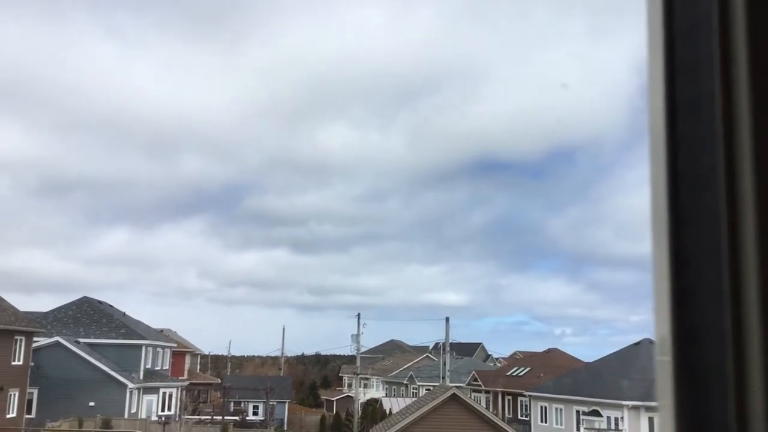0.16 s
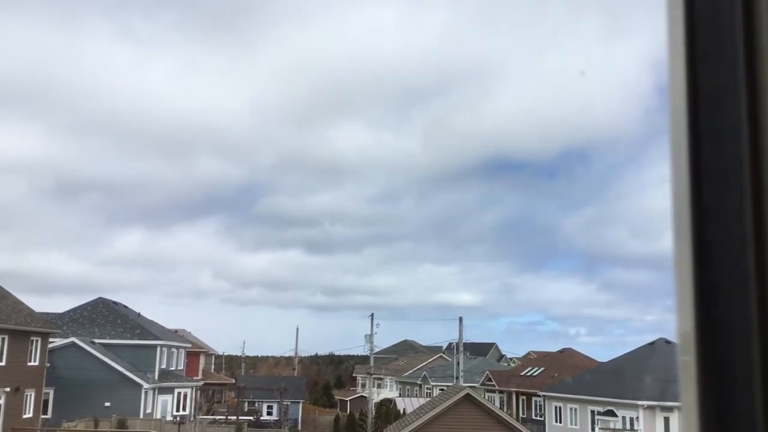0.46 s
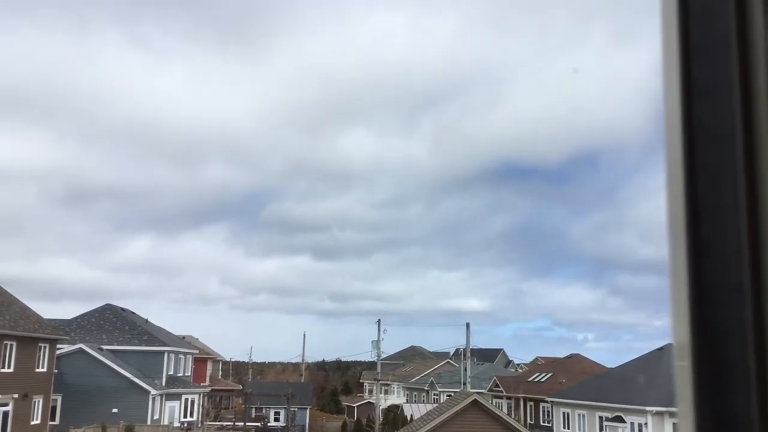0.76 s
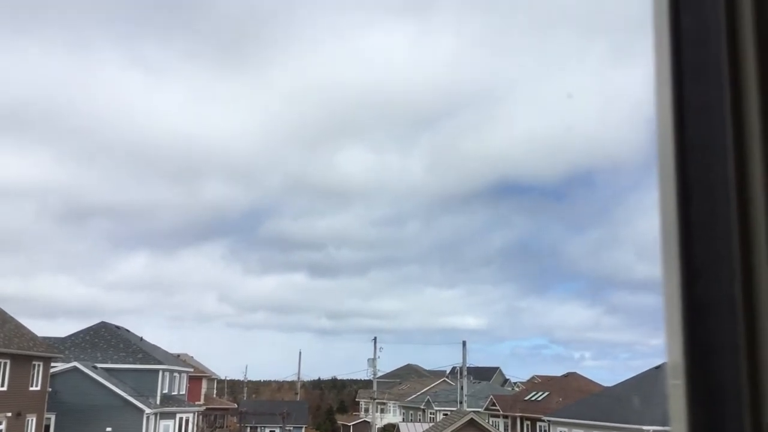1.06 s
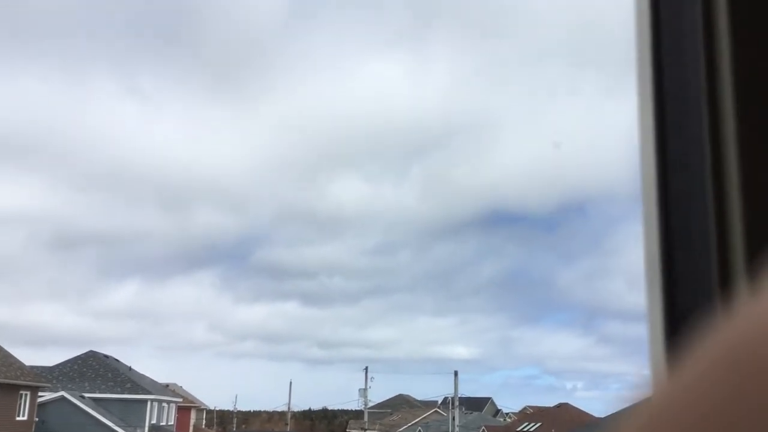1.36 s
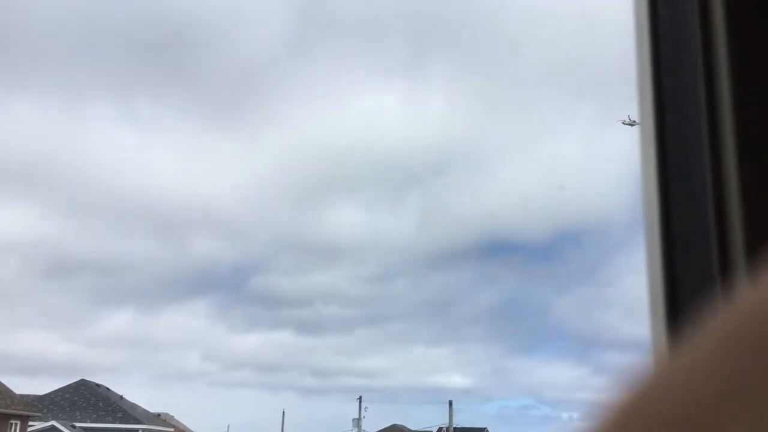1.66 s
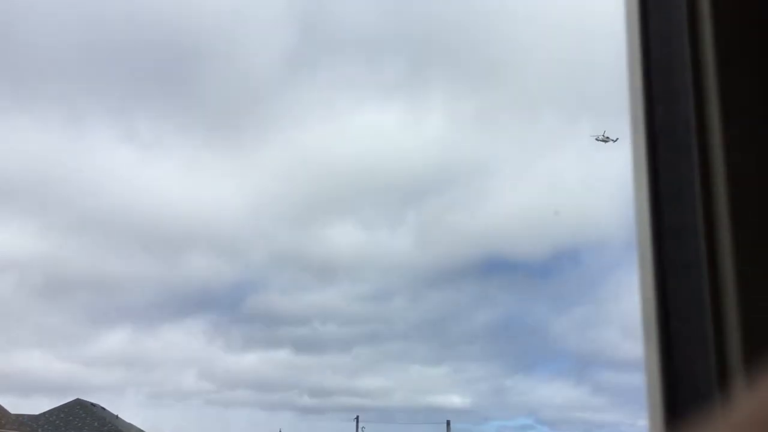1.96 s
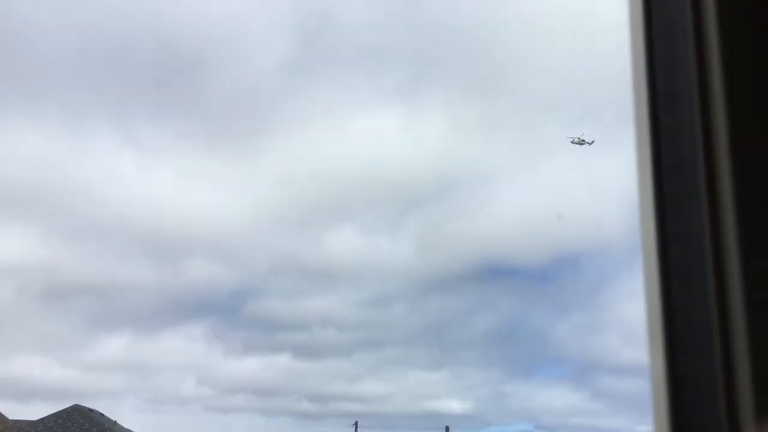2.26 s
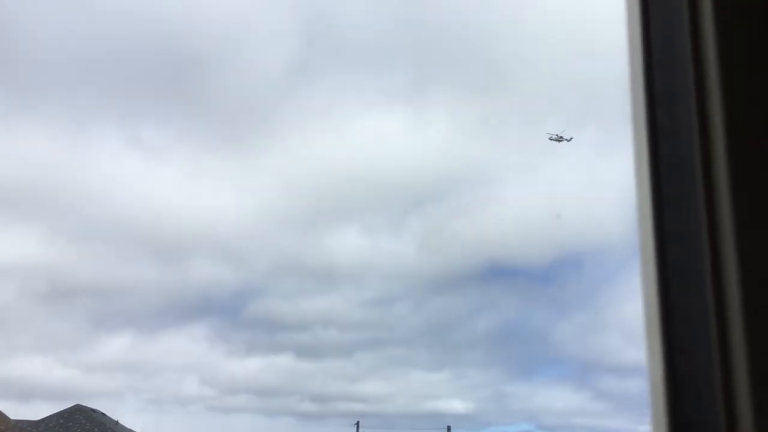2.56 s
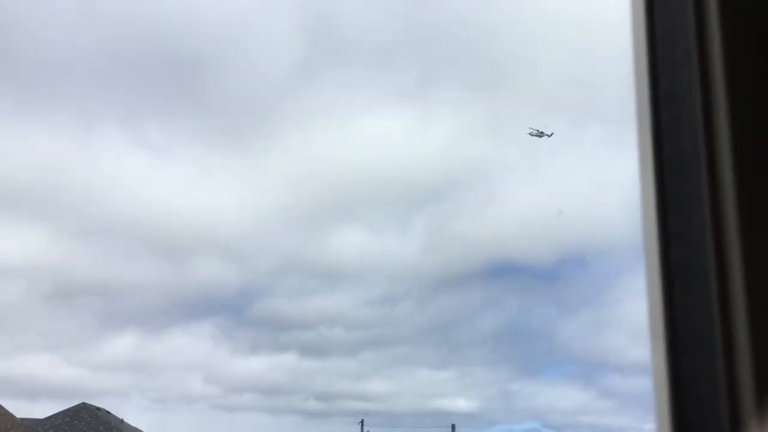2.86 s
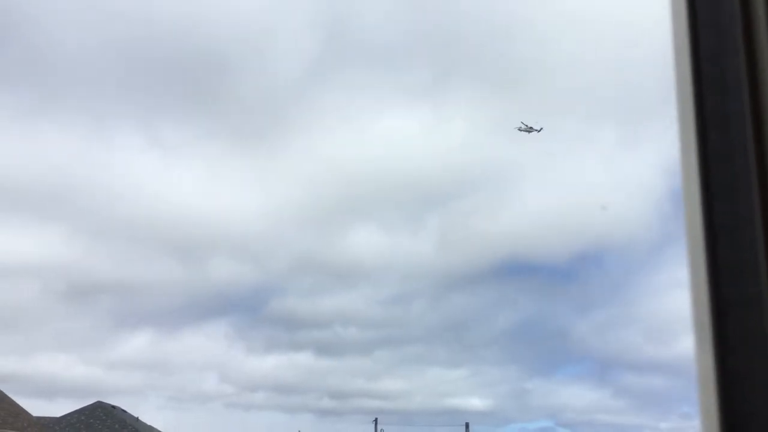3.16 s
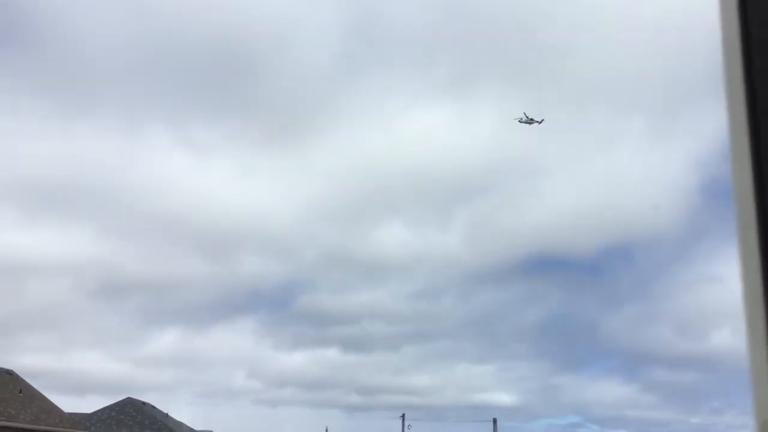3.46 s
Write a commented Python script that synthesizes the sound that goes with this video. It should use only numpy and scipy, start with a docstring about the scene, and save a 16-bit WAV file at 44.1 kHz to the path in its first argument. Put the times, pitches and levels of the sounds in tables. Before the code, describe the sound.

A distant helicopter passes over suburban roofs, heard through a window on a handheld microphone: rapid low thumping first, then swelling hum and roar, with two light finger taps on the case early on.

```python
"""A helicopter flies past far away, heard through an open window over roofs, amid rumble, hiss and faint ticks.
It opens with its strongest main rotor thump: blade-locked tones in a sliding resonance, fading by 1.7 s.
A finger taps a case at 0.56 s and, more faintly, at 0.84 s: each a noise crack and a rising ring.
From 1 s on, tail rotor hum (tones) and engine roar (pulsing noise bands) swell and dip as paths through the air
change; the thump partly returns near 2.5 s, the roar crests near 3.1 s, and hum and thump fade at the end."""
import sys
import numpy as np
from scipy import signal
from scipy.fft import rfft, irfft, next_fast_len
from scipy.io import wavfile
from scipy.ndimage import uniform_filter1d, map_coordinates

SR = 44100
rng = np.random.default_rng(int(sys.argv[2]) if len(sys.argv) > 2 else 0)


def dump_mix(stems):
    """Bounce the given channels to the path in sys.argv[1] as a 16-bit WAV at rate SR."""
    frames = np.atleast_2d(stems).T  # one column per channel
    limited = np.clip(frames, -1, 1)  # hard clip at full scale
    pcm = np.round(limited * 32767).astype(np.int16)
    wavfile.write(sys.argv[1], SR, pcm)


N = 160083


def amp(db):
    """Level to amplitude: 20 dB is a factor of ten."""
    return 10 ** (np.asarray(db) / 20)


def unit(x):
    """Normalisation to an rms of 1."""
    return x / np.sqrt(np.mean(x ** 2) + 1e-20)


def curves(rows):
    """Linear interpolation over time: one curve for each column after the time."""
    times, *columns = np.transpose(rows)
    return [np.interp(np.arange(N) / SR, times, column) for column in columns]


def wobble(knots_per_s):
    """Slow random modulation: a smooth spline through random knots."""
    return map_coordinates(rng.standard_normal(64), [np.arange(N) * knots_per_s / SR])


def coloured(x, points):
    """Linear filtering: x through (frequency [Hz], gain [dB]) points on a log frequency axis."""
    m = next_fast_len(N + 8192)
    hz, db = np.transpose(points)
    log_hz = np.log(np.fft.rfftfreq(m, 1 / SR) + 1)
    gain = amp(np.interp(log_hz, np.log(hz), db, -120, -120))
    return irfft(rfft(x, m) * gain, m)[:N]


def rush(points, patchy_db, count=5):
    """Band-shaped noise of rms 1: random gains, smoothed over count frames, make it patchy in time."""
    spectrum = signal.stft(rng.standard_normal(N + 2048), nperseg=2048)[2]
    field = uniform_filter1d(rng.standard_normal(spectrum.shape), size=count, axis=1)
    patchy = signal.istft(spectrum * amp(patchy_db * unit(field)), nperseg=2048)[1][:N]
    return unit(coloured(patchy, points))


def stack(turns, orders, fade_db, drift_turns, fades_per_s):
    """Multipath interference: each multiple fades and slips on its own as echoes off the roofs shift."""
    total = np.zeros(N)
    for multiple, db in orders:
        gain = amp(db + fade_db * wobble(fades_per_s))
        slip = drift_turns * wobble(fades_per_s)
        total += gain * np.cos(2 * np.pi * (multiple * turns + slip))
    return unit(total)


# Spectrum of the low rumble: (frequency [Hz], gain [dB])
RUMBLE_COLOUR = [(13, -60), (22, -9), (70, -1), (200, -3.5), (260, -32.5), (440, -120)]
RUMBLE_DB = -45


def rumble():
    """Low-pass noise whose level follows, very slightly, that of the deepest rotor tones."""
    deep_db, = curves(DEEP_LEVEL)
    swell_db = 0.1 * (deep_db - deep_db.mean())
    return amp(RUMBLE_DB + swell_db) * rush(RUMBLE_COLOUR, patchy_db=1.5)


# Spectrum of the hiss: (frequency [Hz], gain [dB])
HISS_COLOUR = [(710, -32.5), (1200, -2), (2290, -11.5), (2760, -13.5), (3380, -13.5), (4690, -16.5),
               (7380, -24.5), (8740, -19), (10500, -29.5), (15000, -29.5)]
HISS_DB = -75


def hiss():
    """Broadband noise of constant mean level, uneven in small patches of time and frequency."""
    return amp(HISS_DB) * rush(HISS_COLOUR, patchy_db=4.0)


# Ticks within each period, before colouring: (time [s], level of the noise at onset [dB])
TICK_PATTERN = [(0.01, -66), (0.03, -65), (0.043, -66.5), (.077, -66), (0.081, -71)]
# Spectral shape of every tick: (frequency [Hz], gain [dB])
TICK_COLOUR = [(1200, -5.5), (2300, 5.5), (5000, -1), (6800, -13.5), (9000, -7.5), (12000, -15.5),
               (15000, -25)]
TICK_PERIOD_S, TICK_T60_S = .10004, .025
TICK_JITTER_S, TICK_SCATTER_DB = .0006, .8  # standard deviations
CLICK_DB = 18  # one-sample front over the nominal level of the noise


def ticks():
    """Periodic impulses, ten patterns a second: each a click with an exponentially decaying noise tail."""
    envelope, clicks = np.zeros(N + SR), np.zeros(N + SR)
    t = np.arange(SR // 20) / SR
    for period in range(int(N / SR / TICK_PERIOD_S) + 1):
        for offset_s, db in TICK_PATTERN:
            jitter, scatter = rng.standard_normal(2)
            start = round((period * TICK_PERIOD_S + offset_s + TICK_JITTER_S * jitter) * SR)
            decay_db = -60 * t / TICK_T60_S
            envelope[start:][:len(t)] += amp(db + TICK_SCATTER_DB * scatter + decay_db)
            clicks[start] = amp(db + CLICK_DB)
    noise = envelope[:N] * rng.standard_normal(N)
    return coloured(noise + clicks[:N], TICK_COLOUR)


# Finger taps: (time [s], nominal level [dB], ring frequency at onset [Hz], decay time t60 [s])
TAPS = [(0.5618, -40, 1410, 0.023), (0.843, -57, 9950, .004)]
TAP_GLIDE = .2  # the frequency rises by twice this share within one t60
TAP_CRACK_DB, TAP_CRACK_T60_S = -11, .006  # crack level re ring, before smoothing


def taps():
    """Impact excitation of a case by a finger: a noisy crack, then a short damped ring of rising pitch."""
    out, t = np.zeros(N + SR), np.arange(SR // 10) / SR
    for time_s, db, hz, t60 in TAPS:
        rise = 1 - np.exp(-(t / (t60 / 15)) ** 2)
        cycles = hz * (t + TAP_GLIDE * t ** 2 / t60)
        ring = amp(-60 * t / t60) * rise * np.sin(2 * np.pi * cycles)
        noise = uniform_filter1d(rng.standard_normal(len(t)), size=8)
        crack = amp(TAP_CRACK_DB - 60 * t / TAP_CRACK_T60_S) * noise
        out[round(time_s * SR):][:len(t)] += amp(db) * (ring + crack)
    return out[:N]


# Common level of low roar and slap, before their shares: (time [s], level [dB])
LOW_PATH = [(0.0, -42.5), (0.28, -46.5), (0.85, -38), (1.05, -34), (1.28, -43), (1.49, -40), (1.71, -45.5),
            (2.44, -38.5), (2.54, -32), (2.68, -37.5), (2.8, -33.5), (3.1, -33.5), (3.19, -30),
            (3.28, -41.5), (3.5, -38), (3.63, -40)]
# Level of the middle roar: (time [s], level [dB])
MIDDLE_PATH = [(0.0, -56), (0.08, -42.5), (0.23, -50.5), (0.4, -48), (1.9, -51), (3.04, -46), (3.63, -53)]
# Level of the upper roar: (time [s], level [dB])
UPPER_PATH = [(0.0, -56.5), (1.0, -52.5), (1.24, -54), (1.68, -50), (1.85, -57), (2.05, -52.5),
              (2.25, -47.5), (2.5, -56), (2.75, -48), (2.96, -49), (3.07, -40.5), (3.18, -46), (3.27, -43),
              (3.63, -57)]
# Spectra of the low, middle and upper roar: (frequency [Hz], gain [dB])
LOW_COLOUR = [(88, -50), (150, -12.5), (185, -7), (235, -4.5), (270, -6.5), (298, -1.5), (314, 3.5),
              (334, -7), (371, -30), (490, -59.5)]
MIDDLE_COLOUR = [(210, -39), (365, -4), (421, 4), (460, 2.5), (500, -7), (650, -39)]
UPPER_COLOUR = [(290, -38.5), (495, -16.5), (523, 2), (615, -0.5), (679, 1), (793, -6), (898, -13),
                (1060, -22), (1380, -55)]
LOW_SHARE_DB = -3.5


def engine_roar(blade):
    """Amplitude modulation: three noise bands pulse at the blade rate, the upper one least."""
    low_db, middle_db, upper_db = (curves(rows)[0] for rows in (LOW_PATH, MIDDLE_PATH, UPPER_PATH))
    beat = np.cos(2 * np.pi * (blade + 0.3 * wobble(2.936)))
    low = amp(low_db + LOW_SHARE_DB + 2.1 * beat) * rush(LOW_COLOUR, patchy_db=1.2)
    middle = amp(middle_db + 2.1 * beat) * rush(MIDDLE_COLOUR, patchy_db=2.0)
    upper = amp(upper_db + 0.37 * beat) * rush(UPPER_COLOUR, patchy_db=4.0, count=9)
    return low + middle + upper


# Level of the top of the roar: (time [s], level [dB])
TOP_PATH = [(0.05, -69), (0.3, -76), (0.95, -68.5), (1.25, -73), (1.65, -68.5), (1.93, -72.5), (2.28, -66),
            (2.5, -71.5), (3.1, -62), (3.6, -70)]
# Spectra of the top of the roar and of a narrow band within it: (frequency [Hz], gain [dB])
TOP_COLOUR = [(620, -36), (1060, -2), (1270, -2), (1760, -11.5), (2230, -20.5), (3250, -52.5)]
NARROW_COLOUR = [(900, -40), (955, -7), (986, 0), (1012, -7), (1070, -40)]
NARROW_DB, NARROW_GROWS = 1, 1.4  # mean level over the top band; factor on its swings in dB


def roar_top():
    """Band-pass noise: a wide band and a narrow one share a level curve, the narrow swinging further."""
    top_db, = curves(TOP_PATH)
    mean_db = top_db.mean()
    narrow_db = NARROW_DB + mean_db + NARROW_GROWS * (top_db - mean_db)
    wide = amp(top_db) * rush(TOP_COLOUR, patchy_db=5.0)
    return wide + amp(narrow_db) * rush(NARROW_COLOUR, patchy_db=1.5)


# Level of the lowest blade multiples: (time [s], level [dB])
DEEP_LEVEL = [(0.0, -47), (1.07, -53), (1.41, -49.5), (2.4, -50.5), (2.95, -55), (3.63, -52.5)]
# Balance of those multiples: (multiple of the blade rate [-], relative level [dB])
DEEP_ORDERS = [(2, -8.5), (3, -4), (4, 1.5)]


def deep_tones(blade):
    """Harmonic series: the lowest multiples of the blade rate, slowly fading and slipping."""
    tones = stack(blade, DEEP_ORDERS, fade_db=3, drift_turns=0.03, fades_per_s=3)
    return amp(curves(DEEP_LEVEL)[0]) * tones


# Balance of the slap: (multiple of the blade rate [-], relative level [dB])
SLAP_ORDERS = [(9, -9.5), (10, -11.5), (11, -1), (12, 1.5), (13, -4), (14, -8), (15, -12.5), (16, 0.5),
               (17, 0.5), (18, -11.5)]
SLAP_SHARE_DB = -5
SLAP_LEAD = 0.3016  # blade passes by which the slap comes before the thump


def blade_slap(blade):
    """Harmonic synthesis of a pulse: high blade multiples in step make a slap ahead of each thump."""
    slap = stack(blade + SLAP_LEAD, SLAP_ORDERS, fade_db=2.5, drift_turns=0.11, fades_per_s=2.443)
    return amp(curves(LOW_PATH)[0] + SLAP_SHARE_DB) * slap


# Level of the second multiple of the tail rotor: (time [s], level [dB])
TAIL_LEVEL = [(0.0, -53.5), (0.15, -47.5), (0.8, -51.5), (0.96, -39.5), (1.49, -46), (1.84, -40.5),
              (2.0, -47), (2.79, -35.5), (2.9, -41), (3.24, -37), (3.47, -39.5), (3.63, -68)]
# Swell of the beating pair of tones: (time [s], gain [dB])
PAIR_SWELL = [(0, -0.5), (1.0, 0.5), (1.7, -4), (2.3, 2), (3.2, 6), (3.63, -1.5)]
FIRST_DB, FIFTH_DB = -54, -51.5  # tail fundamental and fifth main-blade multiple, before the swell
TAIL_RATIO = 4.876  # tail cycles per main blade pass
TAIL_LAG = .25  # tail cycles
TAIL_SLIP_HZ = .11  # steady offset of the tail fundamental


def tail_hum(turns, blade):
    """Beating: the tail fundamental lies close to the fifth main-blade multiple; its octave sounds above."""
    tail = 2 * np.pi * (TAIL_RATIO * turns - TAIL_LAG)
    first = np.cos(tail + 2 * np.pi * TAIL_SLIP_HZ * np.arange(N) / SR)
    fifth = np.cos(5 * 2 * np.pi * blade)
    pair = amp(curves(PAIR_SWELL)[0]) * (amp(FIRST_DB) * first + amp(FIFTH_DB) * fifth)
    octave = amp(curves(TAIL_LEVEL)[0]) * np.cos(2 * tail)
    return np.sqrt(2) * (pair + octave)  # levels are rms


# Blade passes heard, sinking as the aircraft goes by: (time [s], rate [1/s])
BLADE_RATE = [(0, 19.64), (1.8, 19.29), (2.3, 19.14), (3.63, 18.87)]
# Thump and its resonance: (time [s], level [dB], centre frequency [Hz])
THUMP = [(0.0, -34.5, 129), (0.2, -39, 127), (0.32, -40.5, 125), (0.55, -42.5, 103), (0.73, -45, 107.8),
         (0.92, -40.5, 118), (1.3, -45.5, 113), (1.73, -61, 115.7), (2.5, -49.5, 126), (3.63, -65, 124.6)]
THUMP_WIDTH_HZ = 23  # standard deviation of the bell


def thump(blade):
    """Resonance: blade multiples 5 to 12 pass one broad bell that slides as the path changes."""
    db, centre_hz = curves(THUMP)
    rate, = curves(BLADE_RATE)
    pulses, power = np.zeros(N), np.zeros(N)
    for multiple in range(5, 13):
        gain = np.exp(-.5 * ((multiple * rate - centre_hz) / THUMP_WIDTH_HZ) ** 2)
        fade = amp(1.5 * wobble(4))
        pulses += gain * fade * np.cos(2 * np.pi * (multiple * blade + .03 * wobble(3)))
        power += gain ** 2 / 2
    return amp(db) * pulses / np.sqrt(power)


FIRST_BLADE = .5  # blade passes until the first thump


def helicopter():
    """Phase locking: thump, slap, tones and the pulsing of the roar all follow one falling blade rate."""
    turns = np.cumsum(curves(BLADE_RATE)[0]) / SR
    blade = turns - FIRST_BLADE
    roar = engine_roar(blade) + roar_top()
    tones = deep_tones(blade) + tail_hum(turns, blade)
    return roar + tones + blade_slap(blade) + thump(blade)


def scene():
    """Superposition of rumble, hiss, ticks, taps and the helicopter."""
    return (rumble() + hiss() + ticks() + taps() + helicopter())[None]


MIC_LOW_HZ, TOP_HZ = 40.3, 15200


def record(dry):
    """Band limiting: the microphone rolls off the deep bass; nothing passes above the upper limit."""
    m = next_fast_len(N + 8192)
    hz = np.fft.rfftfreq(m, 1 / SR)
    response = (hz < TOP_HZ) / (1 + (MIC_LOW_HZ / (hz + 1)) ** 4)
    return irfft(rfft(dry, m) * response, m)[:, :N]


dry = scene()
out = record(dry)
dump_mix(out)
```